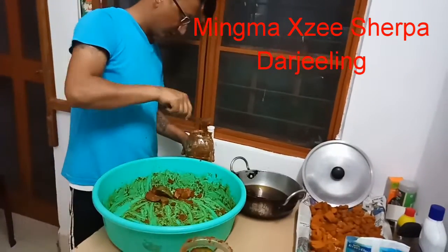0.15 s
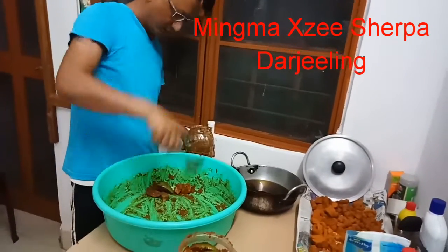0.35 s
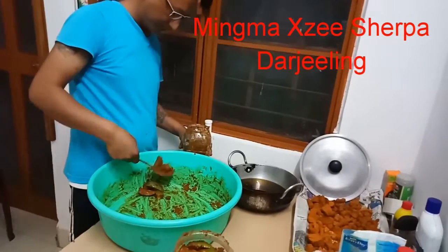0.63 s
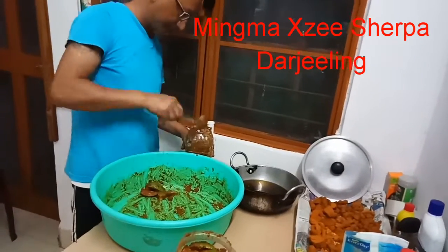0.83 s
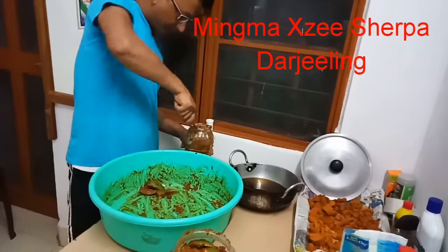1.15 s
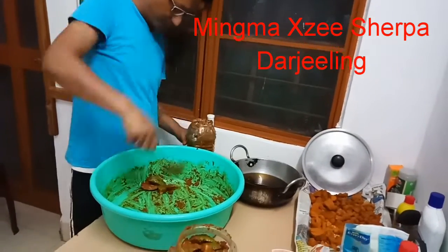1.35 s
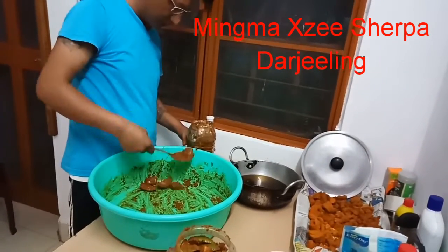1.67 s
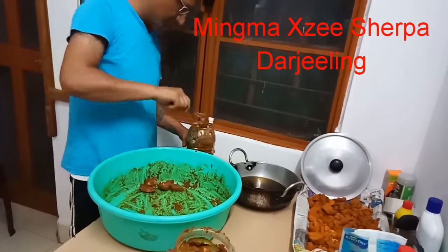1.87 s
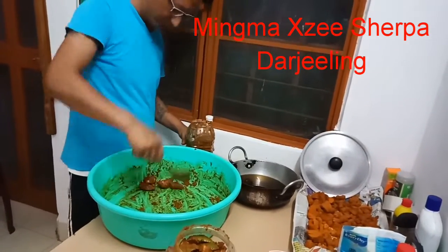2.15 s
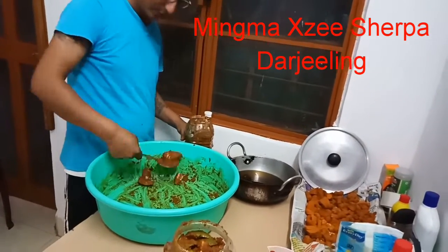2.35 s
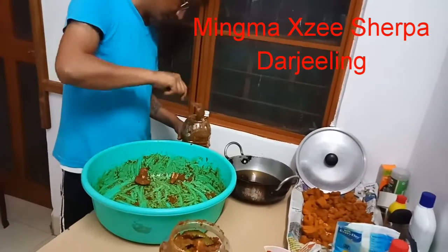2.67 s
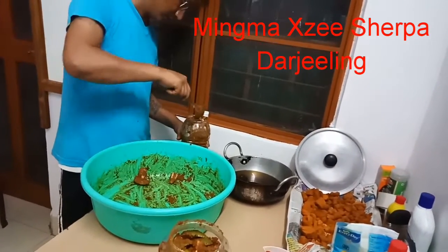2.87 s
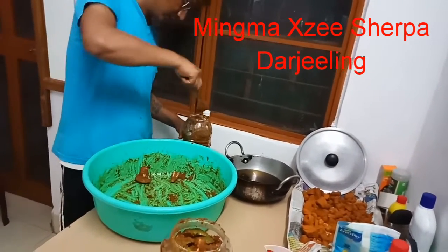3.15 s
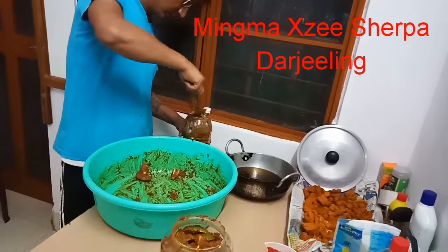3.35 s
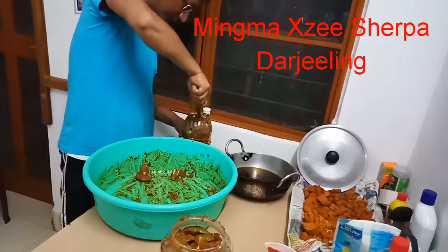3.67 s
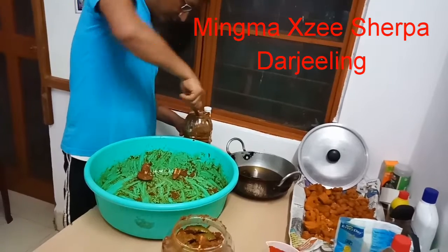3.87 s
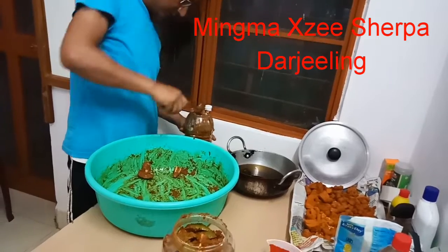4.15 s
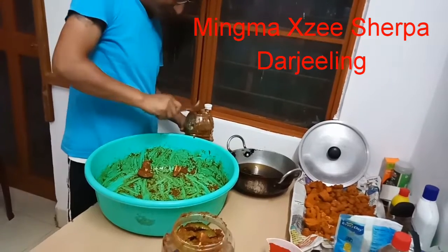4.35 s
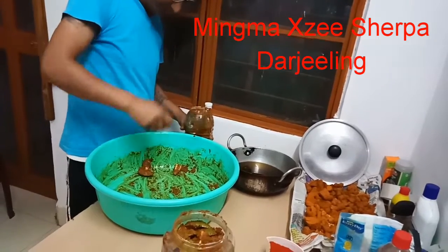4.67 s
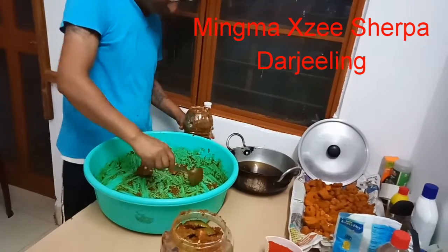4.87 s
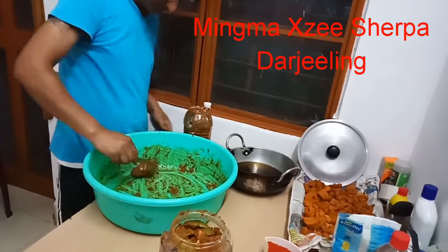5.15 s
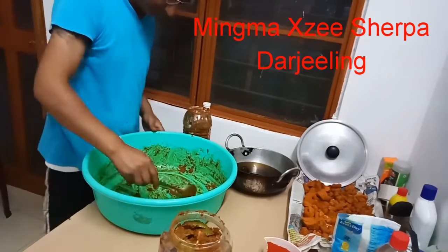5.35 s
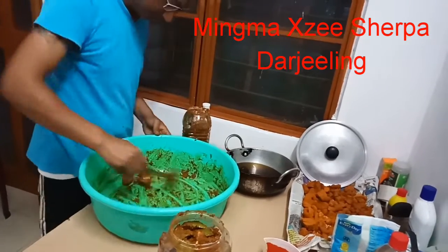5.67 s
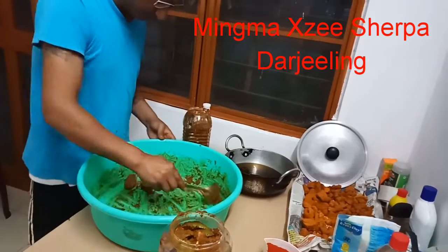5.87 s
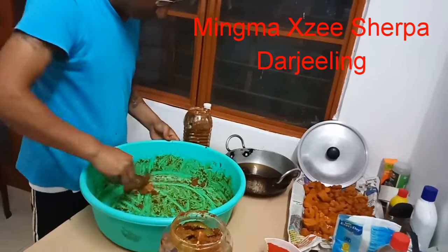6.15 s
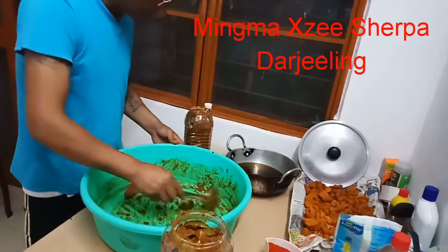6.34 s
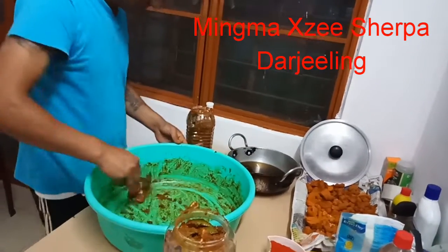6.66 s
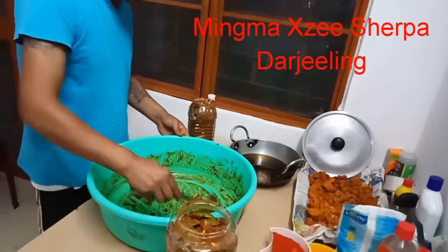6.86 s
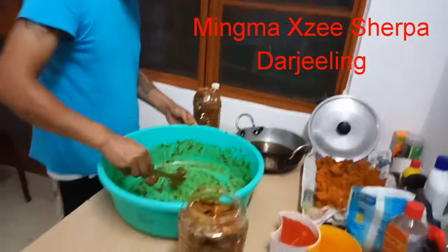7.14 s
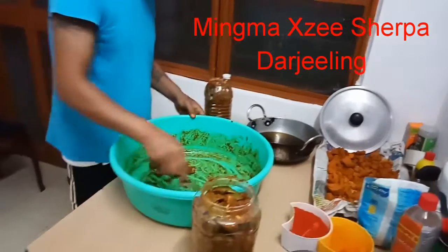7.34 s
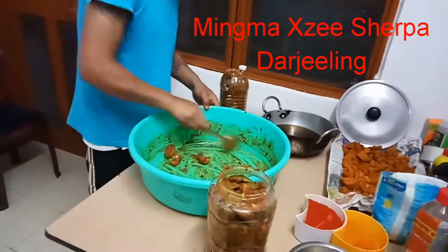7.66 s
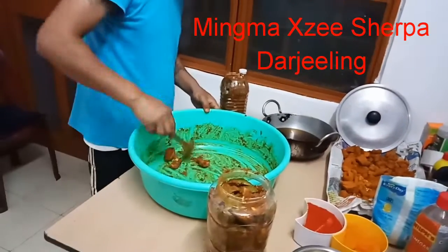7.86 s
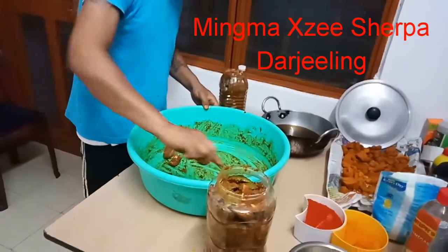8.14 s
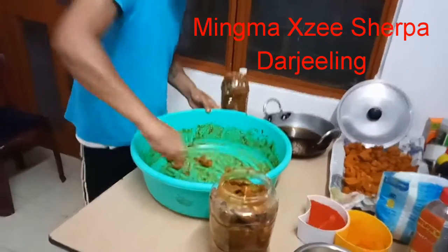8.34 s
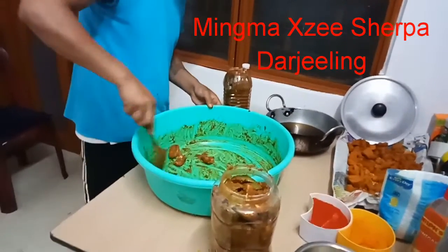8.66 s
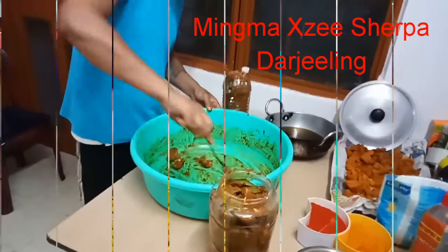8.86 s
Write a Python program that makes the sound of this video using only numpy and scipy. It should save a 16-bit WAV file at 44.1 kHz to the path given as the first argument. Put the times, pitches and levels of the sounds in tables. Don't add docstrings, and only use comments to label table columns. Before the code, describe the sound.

Close up in a small hard kitchen, a spoon knocks lightly and irregularly on a plastic bottle neck while pickle slides in with wet rustles and faint pops. Before three seconds the sound turns fuller and duller. After a sparse stretch, the spoon strikes and scrapes a wide plastic basin, much louder, with hollow booming thuds and short echoes.

```python
import sys
import numpy as np
from scipy import signal
from scipy.fft import rfft, irfft
from scipy.io import wavfile
from scipy.ndimage import uniform_filter1d

SR = 44100
rng = np.random.default_rng(int(sys.argv[2]) if len(sys.argv) > 2 else 0)


def wrap_up_sound(samples):
    columns = np.atleast_2d(samples).T
    tamed = np.clip(columns, -1, 1)
    steps = np.round(tamed * 32767).astype(np.int16)
    wavfile.write(sys.argv[1], SR, steps)


def voltage_ratio(level):
    return 10 ** (np.asarray(level, float) / 20)


N = 396893
TIME = np.arange(N) / SR

# [t/s, peak level/dB, cavity level/dB, wall level/dB, clink level/dB]
BOTTLE_KNOCKS = [(0.0014, -34, -18.5, -7.5, 0), (0.1266, -35, -11, -5.5, -12.5),
                 (0.2794, -25, -35, -10, -7), (0.494, -32.5, -23, -15, 2.2),
                 (0.6936, -25.5, -5, -4.5, -5.5), (0.7528, -36.5, -18, 2.5, -11),
                 (1.035, -41, -21, -10, -9.5), (1.1217, -41.5, -21, -9, -11.5), (1.4267, -44, -19, -3, 5),
                 (1.5114, -37, -32, -15, -5.5), (2.1044, -31, -25, -9, -14), (2.2794, -24, -32, -15, -3),
                 (2.486, -35.5, -14.5, -1, -4.5), (2.5294, -36, -17, -23, -7)]
# [f/Hz, level/dB]
KNOCK_COLOUR = [(35, -80), (60, -20), (229, -32.5), (311, -4), (402, -15), (795, -7.5), (1500, -20),
                (3750, -18), (4420, -23.5), (5330, -18), (11600, -24.5), (15300, -40), (16500, -82)]
# [f/Hz, level/dB]
PICKLE_COLOUR = [(35, -91), (60, -31), (246, -17.5), (318, -20), (432, -9.5), (707, -4.5), (1210, -8),
                 (1330, -11), (1570, -10.5), (1730, -15), (1990, -12), (3840, -12), (11300, -23),
                 (15300, -37), (16500, -55)]
# [f/Hz, width/Hz, level over the broad colour/dB]
BOTTLE_MODES = [(681, 29, -3), (1041, 120, -1), (1586, 42, 0), (2880, 200, -26), (3790, 67, -6.5),
                (4950, 270, -9.5), (6350, 220, -11.5)]
# [f/Hz, width/Hz, level/dB]
NECK_BANDS = [(3810, 230, -4.5), (5150, 190, -3.5), (6570, 300, -3.5)]
# [middle t/s, length/s, rustle level/dB, cavity and hiss level against the rustle/dB]
PICKLE_SLIDES = [
    (.02, 0.29, -52, -5, -8),
    (.3, 0.34, -52, -23, -13),
    (.66, 0.13, -54, -18, -11),
    (.79, 0.17, -55, -18, 7.5),
    (1.43, .1, -58, -15, 2),
    (1.77, 0.2, -54.5, 1.5, -0.5),
    (1.93, 0.38, -52, -13, -14),
    (2.35, 0.091, -51.5, -25, 0),
    (2.55, 0.2, -52, -12, -4),
    (2.67, 0.25, -53.5, -11, -21),
]
# [rustle level/dB, cavity level/dB, hiss level/dB]
SETTLING_DB = (-52.5, -69, -58.5)


def bottle():
    hits = np.array(BOTTLE_KNOCKS)
    _, db, cavity_db, wall_db, clink_db = hits.T
    slap_db = -6 - 0.42 * cavity_db
    parts = [(280, db + wall_db - 12), (1500, db + wall_db), (4700, db), (SR, db + clink_db)]
    burst = struck(hits, parts, slap_db, share=0.42, wet_db=-4.5, slap_t60=0.0084, gap_t60=0.037,
                   rise_t60=0.0015, patchy_db=5.8)
    knocks = through(burst, colour(KNOCK_COLOUR, BOTTLE_MODES)) * voltage_ratio(3.5)
    cavity = through(strikes(hits, db + cavity_db), ring(318, 0.22, 0.00062))
    knocks = knocks + band(cavity, 233, 460) * voltage_ratio(5)

    settling = voltage_ratio(2 * np.array(SETTLING_DB))[:, None]
    rustle, hollow, hiss = np.sqrt(swells(PICKLE_SLIDES) + settling)
    neck = colour(PICKLE_COLOUR, BOTTLE_MODES + NECK_BANDS)
    wet = through(grains(1500, 2.8), neck)
    fizz = through(grains(1500, 2.8), neck)
    rustling = unit(band(wet, 120, 5100)) * rustle * flicker(11.0, 1.34)
    fizzing = unit(band(fizz, 4300, 19000)) * hiss
    humming = unit(band(grains(60, 3.9), 313, 330)) * hollow * voltage_ratio(-4)
    switch_s = 2.7
    return (knocks + rustling + fizzing + humming) * (TIME < switch_s)


# [t/s, peak level/dB, boom level/dB, shell level/dB, edge level/dB]
BASIN_BLOWS = [(3.16, -28.5, -33.5, -9.5, -10), (3.319, -52, -29, -12, -12), (4.533, -46, -26, -9, -6),
               (5.052, -22.5, -24, -13, -19), (5.218, -18, -26.5, -8, -11.5), (5.625, -24, -19, 3, -3),
               (5.635, -13.5, -11, -10, -8), (5.782, -28, -11, -1.5, -3.5), (6.13, -20, -19, -6.5, -8),
               (6.209, -25.5, -13.5, -9, 0.5), (6.589, -13.5, -19, -3, -5), (6.736, -16.5, -26, -21, -7),
               (7.091, -18, -14, -3.5, -9), (7.098, -18, -8, -15, -7), (7.345, -30, -27, -7, -4.5),
               (7.668, -11.5, -26.5, -10, -8), (7.775, -30, -40, -13, 2.5), (8.048, -38, -16, -17, -17),
               (8.861, -30.5, -26.5, -9.5, -21), (8.926, -33, -30, 1.5, -4.5)]
# [f/Hz, level/dB]
BLOW_COLOUR = [(24, -74), (40, -16), (70, -17), (97, -4.5), (164, 3), (308, -1.5), (509, -10.5),
               (886, -8.5), (1470, -13.5), (1580, -11), (1840, -12.5), (3720, -12), (5570, -31),
               (14900, -44.5), (16500, -48)]
# [f/Hz, width/Hz, level over the broad colour/dB]
BASIN_MODES = [(234, 12, -2.5), (287, 43, -0.5), (337.6, 21, 2), (408, 44, 0.5), (640, 41, -5),
               (937, 76, -4.5), (1266, 112, -2.5), (1590, 126, -2.5), (2780, 130, -8), (3930, 170, -19)]
# [middle t/s, length/s, scrape level/dB, shell and boom level against the scrape/dB]
SPOON_STROKES = [(5.13, .2, -52.5, 9, -9), (5.32, 0.34, -63, 13.5, -1), (5.78, 0.28, -35, -8.5, -4),
                 (6.3, 0.33, -46.5, 2, -8), (6.52, 0.35, -40.5, -23, -14), (6.76, 0.29, -35, 5, -8),
                 (6.92, 0.23, -42.5, -1.5, -1.5), (7.08, 0.39, -33.5, -33, -22),
                 (7.29, 0.25, -37, -13, -1.5), (7.8, 0.16, -37, -12, -25), (8.1, 0.28, -42, -8, -22),
                 (8.3, 0.42, -41, -18, -18.5), (8.47, 0.25, -46, -7.5, -15)]


def basin():
    hits, shell = np.array(BASIN_BLOWS), colour(BLOW_COLOUR, BASIN_MODES)
    _, db, boom_db, shell_db, edge_db = hits.T
    slap_db = -2.5 - 0.28 * shell_db
    parts = [(480, db + shell_db - 2), (2000, db), (4700, db + edge_db + 5), (SR, db + edge_db / 2 + 2)]
    burst = struck(hits, parts, slap_db, share=0.97, wet_db=-4.5, slap_t60=0.029, gap_t60=0.12,
                   rise_t60=0.0041, patchy_db=3.5)
    blows = through(burst, shell) * voltage_ratio(4)
    boom = ring(106.23, 0.73, 0.02)
    thud = ring(61.5, 0.52, 0.039)
    blows = blows + through(strikes(hits, db + boom_db), boom) * voltage_ratio(4.5)
    blows = blows + through(strikes(hits, db + boom_db - 13.5), thud)

    scrape, hollow, low = np.sqrt(swells(SPOON_STROKES))
    slip = through(grains(900, 4.8), shell)
    scraping = unit(band(slip, 710, 15000)) * scrape * flicker(20, 1.1)
    shaking = unit(band(slip, 117.3, 370)) * hollow
    booming = unit(through(rng.standard_normal(N), boom)) * low * voltage_ratio(4)
    return blows + scraping - shaking + booming


# [f/Hz, ring/s, hits of [t/s, peak level/dB]]
CLINK_MODES = [
    (3780, 0.13, [(.279, -27.5), (.696, -48), (1.511, -44), (2.105, -41), (2.28, -25.5)]),
    (5250, .1, [(.494, -40), (.815, -47), (1.511, -47), (2.28, -27.5)]),
    (3010, 0.13, [(.283, -35.5), (.699, -30.5)]),
    (2640, 0.17, [(.499, -35), (2.105, -46), (5.219, -35), (6.6, -26), (7.669, -30)]),
    (890, 0.044, [(.279, -28), (.755, -30), (2.105, -39), (2.495, -43)]),
    (560, 0.16, [(2.487, -41), (5.054, -32), (5.219, -25.5)]),
    (1615, 0.073, [(.755, -34.5), (3.161, -35), (5.219, -22), (5.781, -31), (6.59, -17), (6.737, -16.5), (7.095, -18), (8.045, -38), (8.862, -35)]),
    (1308, 0.049, [(5.054, -26.5), (5.219, -25), (7.669, -22)]),
    (1072, 0.54, [(5.645, -20.5), (6.75, -25)]),
    (3690, .06, [(5.054, -46), (5.219, -26.5), (6.211, -28), (6.737, -31), (6.59, -19), (7.669, -19)]),
]


def clinks():
    hits = [(s, db, hz, t60) for hz, t60, woken in CLINK_MODES for s, db in woken]
    count, spread = 6, 0.075
    detune = np.linspace(-1, 1, count) + rng.uniform(-0.196, 0.198, (len(hits), count))
    detune = 1 + spread * detune
    lag_s = rng.uniform(0, 0.00299, detune.shape)
    cluster = []
    for (s, db, hz, t60), ratios, lags in zip(hits, detune, lag_s):
        cluster += [(s + lag, db - 9.5, hz * ratio, t60) for ratio, lag in zip(ratios, lags)]
    return soft_rings(cluster, 0.00042)


# [t/s, peak level/dB, f/Hz, ring/s]
BODY_BUMPS = [(0.103, -46.5, 323, 0.25), (0.181, -48, 324, 0.18), (1.039, -53, 328, 0.13),
              (1.704, -46.5, 319, 0.22), (1.974, -47, 333, 0.33), (2.861, -52, 213, 0.17),
              (3.551, -47, 223, 0.14), (3.95, -45, 231, 0.18), (4.586, -44, 326, 0.27),
              (5.218, -22.5, 360, 0.039), (5.64, -20.5, 400, 0.15), (6.587, -17.5, 320, 0.068),
              (6.735, -16, 313.7, 0.15), (7.552, -42, 396, 0.34), (7.668, -20.5, 304, 0.07),
              (8.089, -34.5, 305, 0.18), (8.324, -27, 336, 0.18), (8.427, -40.5, 393, 0.17),
              (8.521, -38, 336, 0.058), (8.92, -31, 333, 0.1)]


def bumps():
    return soft_rings(BODY_BUMPS, 0.0037)


# [t/s, peak level/dB, f/Hz, ring/s]
WET_POPS = [
    (0.159, -46, 1845, 0.15),
    (0.384, -49, 694, 0.12),
    (0.629, -48, 1025, 0.5),
    (1.084, -48, 1550, 0.067),
    (1.213, -48, 1190, 0.063),
    (1.348, -44, 713, 0.095),
    (1.398, -52, 700, 0.08),
    (2.219, -49, 690, 0.073),
    (2.35, -45, 2650, 0.08),
    (2.637, -47.5, 697, 0.1),
]


def pops():
    return soft_rings(WET_POPS, 0.005)


# [t/s, level/dB]
ROOM_TONE = [
    (2.7, -52),
    (4, -51.5),
    (5, -50.5),
    (6.05, -50),
    (8.5, -48),
    (8.65, -55),
    (9, -60.5),
]
# [f/Hz, level/dB]
ROOM_COLOUR = [(35, -74), (60, -12), (94, -10.5), (229, -4.5), (333, -4.5), (474, -7.5), (959, -11),
               (1270, -8), (1570, -12), (1730, -11), (1900, -12.5), (3660, -22), (5330, -38),
               (14600, -46.5), (16500, -68)]


def kitchen():
    edges = 80 * 2 ** np.arange(9.)
    air = np.zeros(N)
    for lo, hi in zip(edges, edges[1:]):
        air += band(rng.standard_normal(N), lo, hi) * flicker(12, 0.8)
    room_modes = [(225, 24, -4.5), (316, 22, -1.5), (1250, 93, -11), (1720, 53, -5)]
    tone = through(air, colour(ROOM_COLOUR, room_modes))
    s, db = np.transpose(ROOM_TONE)
    return unit(tone) * voltage_ratio(np.interp(TIME, s, db, left=-200, right=-200))


# [f/Hz, decay/s]
ROOM_T60_S = [(100, 0.55), (300, 0.56), (1000, 0.61), (3000, 0.5), (8000, 0.41), (15000, 0.51)]


def struck(table, parts, slap_db, share, wet_db, slap_t60, gap_t60, rise_t60, patchy_db):
    out = np.zeros(N)
    span = slice(int(table[0, 0] * SR), int((table[-1, 0] + 1) * SR))
    for hz in 50 * 2 ** np.arange(0, 9., 0.5):
        db = sum(next(db for top, db in parts if f < top) for f in (hz / 1.3, hz * 1.3)) / 2
        power = strikes(table, 2 * db)[span]
        slap = strikes(table, 2 * (db + slap_db))[span]
        echoes = fading(power, share * over_hz(ROOM_T60_S, hz)) - fading(power, gap_t60)
        sharp = (hz / 1000) ** 0.19
        direct = sharp * (fading(slap, slap_t60 / sharp) - fading(slap, rise_t60 / sharp))
        width = 2 ** 0.25
        air = band(rng.standard_normal(len(power)), hz / width, hz * width)
        clumps = flicker(40, patchy_db)[span] ** 2
        out[span] += air * np.sqrt(np.maximum(direct + clumps * echoes * voltage_ratio(2 * wet_db), 0))
    return out


def strikes(table, db):
    out = np.zeros(N)
    out[(table[:, 0] * SR).astype(int)] = voltage_ratio(db)
    return out


def fading(x, t60):
    return signal.lfilter([1], [1, -10 ** (-6 / (t60 * SR))], x)


def swells(table):
    power = np.zeros((3, N))
    shape, linger_t60 = 1.5, 0.22
    for s, length, db, *against_db in table:
        bell = np.cos(np.pi * np.clip((TIME - s) / length, -0.5, 0.5)).clip(0) ** (2 * shape)
        power += voltage_ratio(2 * (db + np.array([0, *against_db])))[:, None] * bell
    return fading(power, linger_t60) * 6 * np.log(10) / (linger_t60 * SR)


def ring(hz, t60, rise):
    t = TIME[:int(min(t60, 1) * SR)]
    h = np.sin(2 * np.pi * hz * t) * voltage_ratio(-60 * t / t60) * (1 - np.exp(-t / rise))
    return h / h.max()


def soft_rings(table, rise):
    out = np.zeros(N + SR)
    for s, db, hz, t60 in table:
        note = ring(hz, max(t60, 0.02), rise) * voltage_ratio(db)
        start = int(s * SR)
        out[start:start + len(note)] += note
    return out[:N]


def grains(rate, spread_db):
    size = voltage_ratio(spread_db * np.minimum(rng.exponential(size=N), 3))
    hits = (rng.random(N) < rate / SR) * rng.standard_normal(N) * size
    return unit(unit(hits) + 1.7 * rng.standard_normal(N))


def flicker(rate, db):
    k = int(SR / rate)
    steps = np.repeat(rng.standard_normal(N // 100), k)[:N]
    return voltage_ratio(db * uniform_filter1d(uniform_filter1d(steps, k), k))


def colour(spectrum, modes=(), size=4096):
    hz = np.arange(size // 2 + 1) * SR / size
    lift = 1 + sum(voltage_ratio(2 * db) * 4 / (1 + (2 * (hz - f) / w) ** 2) for f, w, db in modes)
    cep = irfft(np.log(voltage_ratio(over_hz(spectrum, hz)) * np.sqrt(lift)))
    cep[1:size // 2] *= 2
    cep[size // 2 + 1:] = 0
    h = irfft(np.exp(rfft(cep)))
    return h / np.sqrt(np.sum(h ** 2))


def over_hz(table, hz):
    table = np.array(table, float)
    return np.interp(np.log(np.maximum(hz, 1)), np.log(table[:, 0]), table[:, 1])


def through(x, h):
    return signal.oaconvolve(x, h)[:N]


def band(x, lo_hz, hi_hz):
    sos = signal.butter(2, [lo_hz, min(hi_hz, 0.45 * SR)], "bandpass", fs=SR, output="sos")
    return signal.sosfilt(sos, x)


def unit(x):
    return x / np.sqrt(np.mean(x ** 2))


def scene():
    return (bottle() + basin() + kitchen() + bumps() + pops() + clinks())[None]


def low_pass(x):
    return signal.sosfilt(signal.butter(12, 16610, fs=SR, output="sos"), x)


def record(dry):
    window_s, threshold_db, knee_db, depth_db = 0.0087, -57, -0.5, 4.5
    level_db = 10 * np.log10(uniform_filter1d(dry ** 2, int(window_s * SR), axis=1) + 1e-12)
    held = 1 / (1.5 + np.exp((level_db - threshold_db) / knee_db))
    levelled = dry * voltage_ratio(-depth_db * held)
    cut = signal.ellip(8, 0.2, 60, 16300, fs=SR, output="sos")
    mix = signal.sosfilt(cut, levelled) - 2e-4
    return low_pass(mix)


dry = scene()
out = record(dry)
wrap_up_sound(out)
```